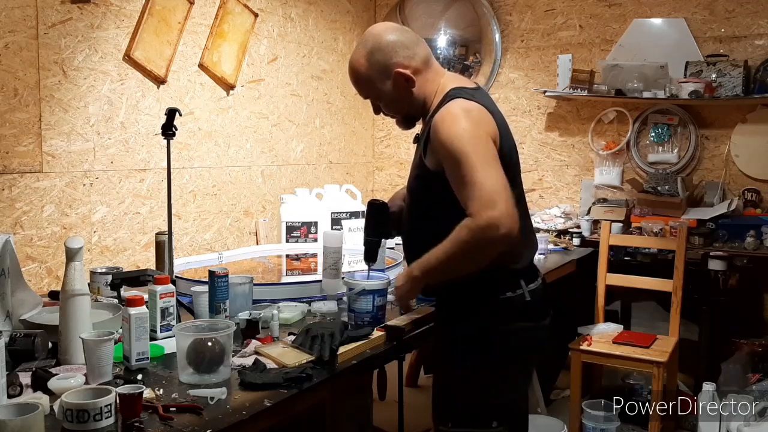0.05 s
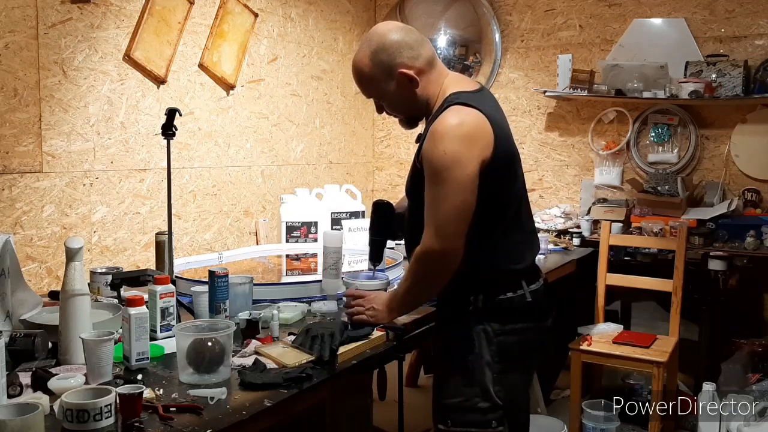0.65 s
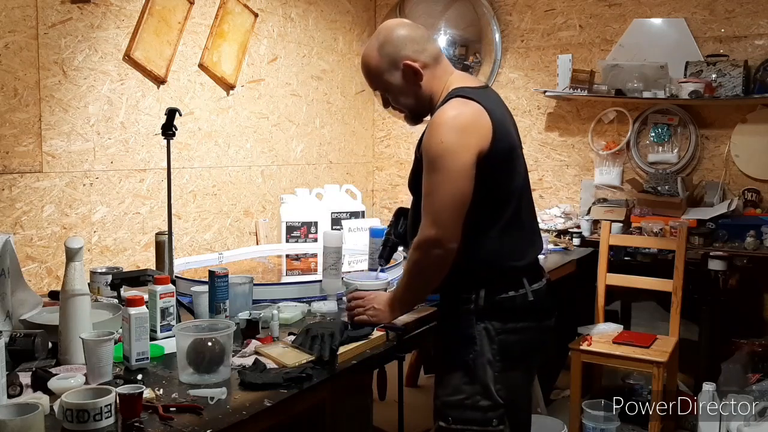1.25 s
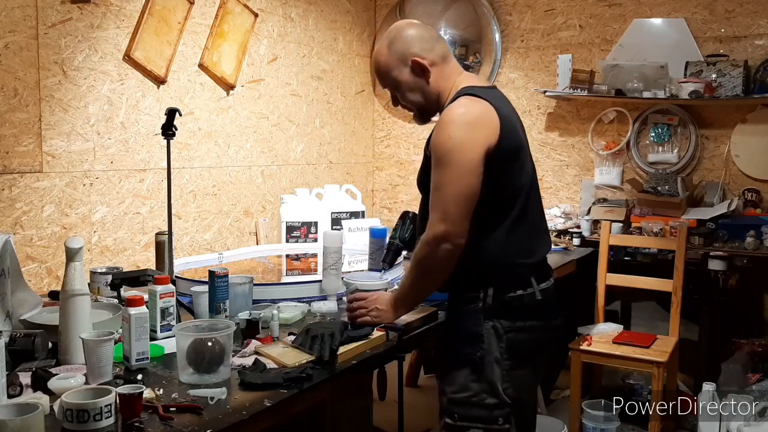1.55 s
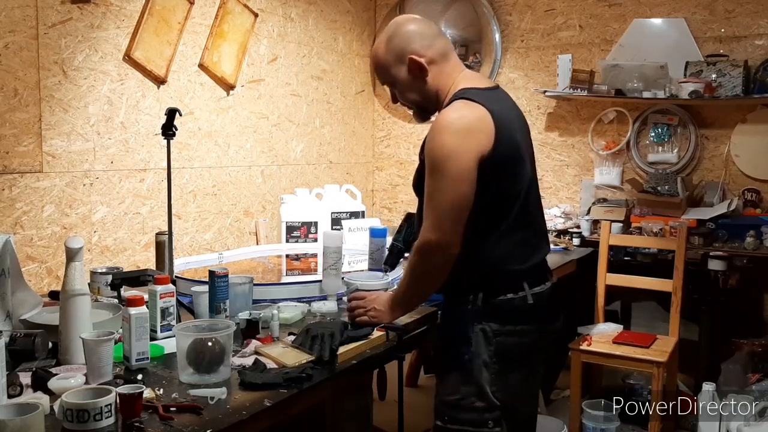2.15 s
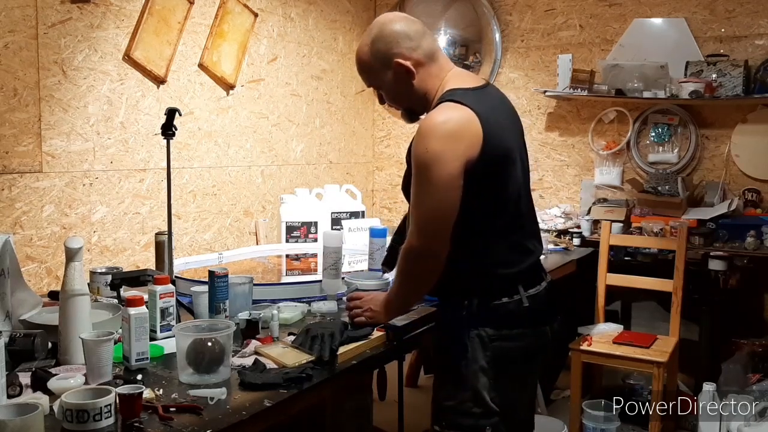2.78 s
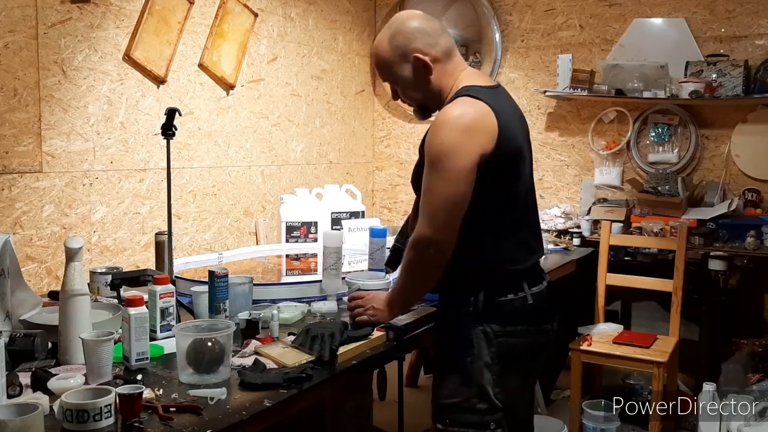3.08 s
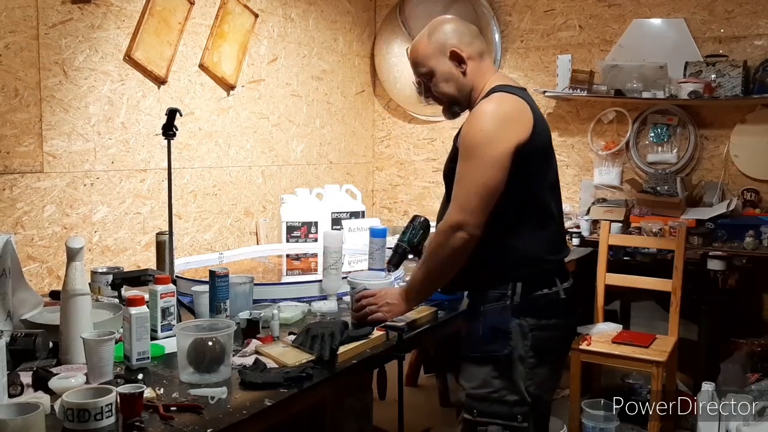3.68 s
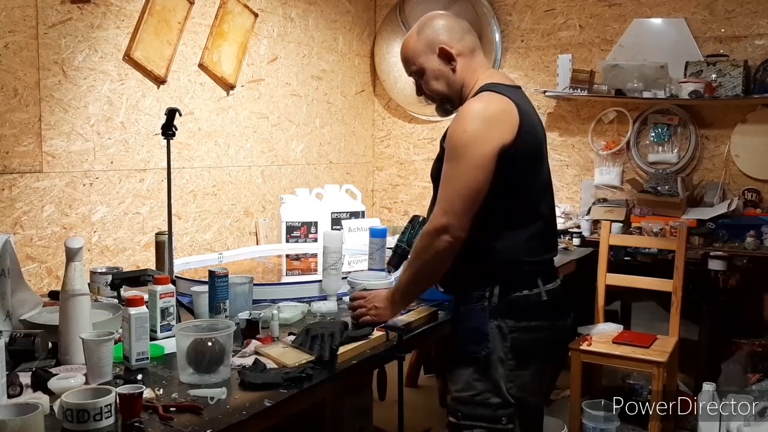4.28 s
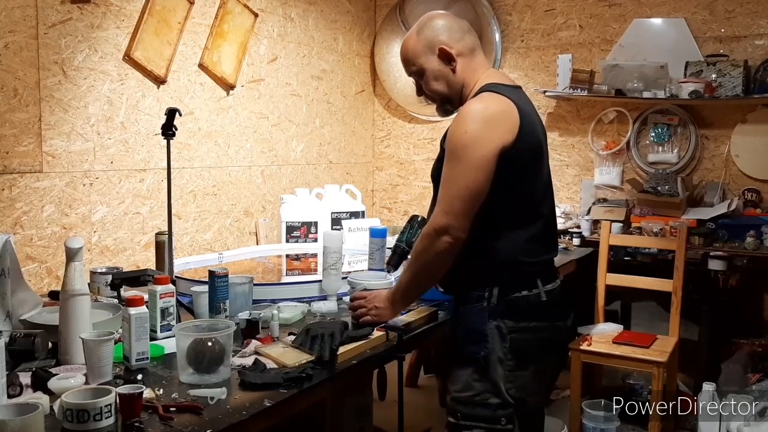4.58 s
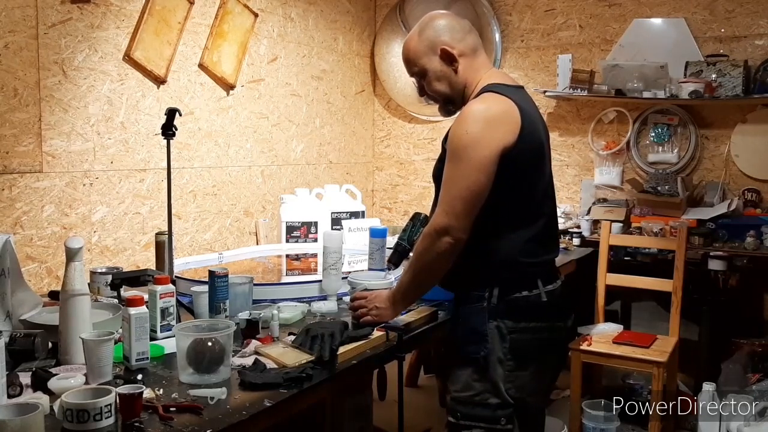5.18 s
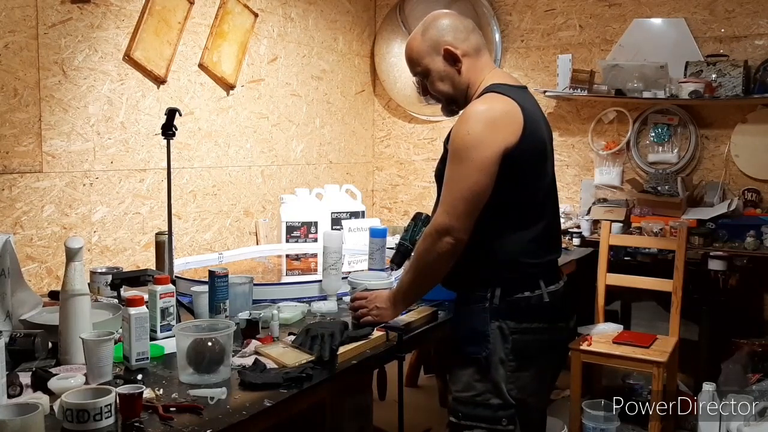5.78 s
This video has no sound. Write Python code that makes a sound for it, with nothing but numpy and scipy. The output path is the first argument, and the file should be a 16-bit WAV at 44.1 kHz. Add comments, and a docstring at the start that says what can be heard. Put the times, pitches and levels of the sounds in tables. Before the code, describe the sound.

A cordless drill whines steadily at low speed, stirring thick paste in a cup in a small workshop.

```python
"""A cordless drill turns a paddle in a cup of thick paste, at an even low speed, in a small workshop.
From the start the motor hums and whines on multiples of its shaft speed, over the rasp of gears and
cooling air; as the drill is moved about, its tones swell and fade on each side.
Near 1 s the faint shaft tone swells once. Around 2.8 s two soft bumps hit the bench amid a low rustle.
The drill runs on to the end."""
import sys
import numpy as np
from scipy import signal
from scipy.io import wavfile
from scipy.ndimage import uniform_filter1d

SR = 44100
rng = np.random.default_rng(int(sys.argv[2]) if len(sys.argv) > 2 else 0)


def put_to_file(sound):
    """Save the sound as 16-bit audio at rate SR, in the file named by the first command-line argument."""
    columns = np.atleast_2d(sound).T  # one column per channel
    safe = np.clip(columns, -1, 1)
    whole_steps = np.round(safe * 32767)
    wavfile.write(sys.argv[1], SR, whole_steps.astype(np.int16))


N = 257544
HOP = 256
TIME = np.arange(N) / SR


def amp(db):
    """Decibels to gain."""
    return 10 ** (np.asarray(db) / 20)


def unit(x):
    """Scale to rms 1."""
    return x / np.sqrt(np.mean(abs(x) ** 2) + 1e-20)


def swell(centre_s, sigma_s):
    """Gaussian in time, peak 1."""
    return np.exp(-((TIME - centre_s) / sigma_s) ** 2 / 2)


def curves(rows):
    """Table columns, interpolated over time."""
    times_s, *columns = np.transpose(rows)
    return [np.interp(TIME, times_s, column) for column in columns]


def spectra(rows, hz):
    """Table columns, interpolated over log frequency."""
    row_hz, *columns = np.transpose(rows)
    return np.array([np.interp(np.log(hz + 1), np.log(row_hz), column) for column in columns])


def drift(rate_hz, count=2048):
    """Complex noise, rms 1, rolling off above rate_hz."""
    hz = np.fft.fftfreq(count, HOP / SR)
    spectrum = rng.standard_normal(count) + 1j * rng.standard_normal(count)
    smooth = np.fft.ifft(spectrum / (1 + (hz / rate_hz) ** 2))
    return unit(np.interp(TIME, np.arange(count) * HOP / SR, smooth))


def patches(shape, frames, bins):
    """Random field per side, rms 1, smoothed over frames and bins."""
    field = uniform_filter1d(rng.standard_normal(shape), frames, axis=1, mode="wrap")
    return unit(uniform_filter1d(field, bins, axis=2))


def tone(cycles, hz, scatter, fade_hz, flutter):
    """Stereo tone, rms 1: a steady part plus room reflections that shift as the drill moves."""
    paths = np.array([1 + scatter * drift(fade_hz) + flutter * drift(rate_hz=29) for side in range(2)])
    lead_rad = min(hz / 1100, np.pi / 2)  # short waves reach the sides out of step
    paths[0] *= np.exp(1j * lead_rad)
    wave = (paths * np.exp(2j * np.pi * (cycles + rng.random()))).real
    return np.array([unit(side) for side in wave])


def rustle(level_db=-71, band_hz=(80, 260)):
    """Faint low noise around the bumps."""
    band = signal.butter(2, band_hz, "bandpass", fs=SR, output="sos")
    noise = unit(signal.sosfilt(band, rng.standard_normal(N)))
    return amp(level_db) * swell(centre_s=2.8, sigma_s=0.44) * noise


def bumps(body_hz=255, thud_hz=140, thud_db=-8):
    """Two pairs of dull pushes rise and die quickly in two low modes of the bench top."""
    # Each row: start in seconds, level in dB, rise time in seconds.
    pushes = [(2.673, -60, 0.0095), (2.723, -52.5, 0.011), (2.856, -52, 0.007), (2.864, -54, .011)]
    out = np.zeros(N)
    for start_s, db, rise_s in pushes:
        age_s = np.maximum(TIME - start_s, 0)
        envelope = age_s / rise_s * np.exp(1 - age_s / rise_s)
        ring = np.sin(2 * np.pi * body_hz * age_s) + amp(thud_db) * np.sin(2 * np.pi * thud_hz * age_s)
        out += amp(db) * envelope * ring
    return out


def rasp(turns, ripple_db=3.0, patchy_db=0.5, flicker_db=0.39, pivot_hz=1850, width_octaves=0.31):
    """Gear, brush and cooling-air noise, coloured by shifting reflections, pulsing with each turn."""
    # Each row: frequency in Hz, left and right base density in dB per Hz.
    density = [(30, -105, -106), (100, -97, -101.5), (456, -91.5, -93), (660, -81.5, -77),
               (676, -82.5, -92.5), (1304, -78, -80.5), (2410, -71.5, -72.5), (3640, -67, -68.5),
               (4370, -64, -63.5), (5330, -71, -67.5), (7130, -70.5, -72), (8620, -78.5, -80.5),
               (11950, -75.5, -78.5), (15000, -84.5, -84)]
    # Each row: frequency in Hz, left-right correlation from 0 to 1.
    correlation = [(30, .93), (90, 0.76), (300, 0.56), (650, 0.86), (1400, 0), (3000, 0.25), (15000, 0.05)]
    # Drill tilted and shielded by the arm. Each row: time in seconds, gain in dB, mid-range tilt in dB.
    posture = [(0.0, 0.9, 0.7), (0.88, 0.6, 1.5), (1.0, 0.1, 0.5), (2.2, 0.4, -0.5), (2.4, -0.8, -0.6),
               (3.22, -0.4, -0.0), (3.36, 0.4, -1.0), (3.48, 0.1, 0.4), (4.48, -0.2, -0.6),
               (5.04, -0.1, -0.0), (5.42, -0.7, -0.9), (5.84, -0.4, 0.2)]
    hz = np.fft.rfftfreq(8 * HOP, 1 / SR)
    frames = N // (2 * HOP) + 6
    shape = (2, frames, len(hz))
    spectrum = rng.standard_normal(shape) + 1j * rng.standard_normal(shape)
    shared = np.clip(spectra(correlation, hz)[0], 0, 1)
    spectrum[1] = shared * spectrum[0] + np.sqrt(1 - shared ** 2) * spectrum[1]
    colour = amp(spectra(density, hz))
    room_db = ripple_db * patches(shape, frames=45, bins=3)
    gear_db = patchy_db * patches(shape, frames=7, bins=30)
    spectrum *= colour[:, None] * amp(room_db + gear_db)
    # Positive tilt lifts the band above the pivot and lowers the band below.
    gain_db, tilt_db = curves(posture)
    frame_tilt_db = np.interp(np.arange(frames) * 2 * HOP / SR, TIME, tilt_db)
    offset = np.log2((hz + 1) / pivot_hz) / width_octaves
    spectrum *= amp(np.outer(frame_tilt_db, offset * np.exp((1 - offset ** 2) / 2)))
    _, noise = signal.istft(spectrum.transpose(0, 2, 1), nperseg=8 * HOP, noverlap=6 * HOP)
    noise = unit(noise[:, :N]) * np.sqrt(np.mean(colour ** 2) * SR / 2)
    pulse = 1 + 0.04 * (np.cos(2 * np.pi * turns) + np.cos(4 * np.pi * turns))
    flicker = unit(drift(rate_hz=15).real)
    return noise * pulse * amp(gain_db + flicker_db * flicker)


def gears(turns, shaft_hz, gear_ratio=6.41):
    """Thin, wavering tones from rotor and gear teeth; low hum from the first planet carrier."""
    # Each row: multiple of shaft speed, left level in dB, right level in dB.
    overtones = [(4, -60, -62), (7, -61, -54), (9, -55, -51), (9.53, -57, -66), (10.39, -47, -49),
                 (11, -52, -53), (11.53, -54, -62), (12, -54, -55), (13, -49, -49), (14, -51, -46),
                 (16, -56, -48), (18, -51, -52), (19.93, -52, -51), (21, -52, -50), (22, -49, -49),
                 (23, -54, -55), (24, -51, -54), (25, -54, -59), (26, -57, -59), (29, -57, -61),
                 (30, -54, -56), (31, -59, -60), (33, -59, -64), (35, -59, -62), (37, -60, -62),
                 (39, -60, -63), (40, -52, -54), (45, -65, -65)]
    # Each row: multiple of carrier speed, level in dB.
    carrier = [(1, -80.5), (2, -83.5), (3, -87), (4, -84), (5, -100), (7, -80.5), (9, -78)]
    out = np.zeros((2, N))
    for multiple, left_db, right_db in overtones:
        gain = amp([[left_db], [right_db]])
        out += gain * tone(multiple * turns, multiple * shaft_hz, scatter=4.8, fade_hz=1.43, flutter=1)
    for multiple, db in carrier:
        ratio = multiple / gear_ratio
        out += amp(db) * tone(ratio * turns, ratio * shaft_hz, scatter=0.14, fade_hz=1.2, flutter=0.23)
    return out


def motor_hum(turns, shaft_hz, left_bias_db=2.0):
    """First three shaft harmonics, louder on the left; the lowest swells once."""
    # Each row: time in seconds, base levels of harmonics 2 and 3 in dB.
    levels = [(0.0, -53.1, -53.5), (0.96, -50.3, -50.9), (2.26, -51.3, -52.5), (2.38, -51.9, -58.0),
              (3.92, -50.2, -50.8), (4.54, -49.8, -53.2), (4.68, -49.1, -60.7), (5.02, -50.2, -52.4),
              (5.84, -48.3, -51.8)]
    second_db, third_db = curves(levels)
    first_db = -73.5 + 8 * swell(centre_s=0.93, sigma_s=0.46)
    side_db = np.array([[left_bias_db], [-left_bias_db]])
    out = np.zeros((2, N))
    for multiple, db, flutter in [(1, first_db, 0.15), (2, second_db - 0.2, 0.05), (3, third_db, 0.2)]:
        wave = tone(multiple * turns, multiple * shaft_hz, scatter=0.14, fade_hz=6, flutter=flutter)
        out += amp(db + side_db) * wave
    return out


def motor_highs(turns, shaft_hz, fifth_db_per_s=0.34, octave_db_per_s=-0.5):
    """Wavering tones a fifth and an octave above the whine; the octave flares as the drill moves."""
    # Each row: centre in seconds, left gain in dB, right gain in dB.
    flares = [(.12, 6, 7), (.85, 3, 3), (1.33, 7, -3), (1.56, -2, 7.5), (2.03, 1, 10), (3.08, 2, 4),
              (3.35, 8, 2)]
    fifth_db = np.array([[-45], [-43.5]]) + fifth_db_per_s * TIME
    octave_db = -43 + octave_db_per_s * TIME
    for centre_s, *gain_db in flares:
        octave_db = octave_db + np.outer(gain_db, swell(centre_s, sigma_s=0.061))
    out = np.zeros((2, N))
    for multiple, db in [(15, fifth_db), (20, octave_db)]:
        wave = tone(multiple * turns, multiple * shaft_hz, scatter=0.54, fade_hz=7, flutter=0.81)
        out += amp(db) * wave
    return out


def motor_whine(turns, cycles_per_turn=10, echo_db=-46, shake=0.071):
    """Main motor tone; standing waves in the room steer it between the sides."""
    # Each row: time in seconds, left and right direct level in dB, left phase lead in radians.
    steering = [(0.0, -36.2, -41.3, 1.4), (0.18, -39.0, -33.5, 3.5), (0.26, -34.8, -42.4, 0.3),
                (0.8, -37.1, -34.8, 0.8), (1.08, -25.6, -36.8, 2.0), (1.24, -26.6, -40.5, 1.0),
                (1.38, -42.4, -38.1, 1.7), (1.5, -33.1, -34.2, -0.1), (1.68, -37.0, -36.0, 1.7),
                (1.88, -29.5, -37.1, 2.9), (2.18, -27.5, -28.7, 1.8), (2.44, -30.3, -32.0, 2.8),
                (2.9, -31.5, -41.4, 2.2), (2.98, -33.5, -40.7, 0.6), (3.18, -30.4, -37.6, 3.2),
                (3.36, -25.9, -34.6, 1.7), (3.66, -29.8, -37.8, 2.4), (3.8, -35.9, -35.2, 0.8),
                (4.14, -29.2, -36.8, 1.7), (5.84, -29.4, -28.1, 1.6)]
    left_db, right_db, lead_rad = curves(steering)
    tremble = 1 + shake * np.array([drift(rate_hz=42) for side in range(2)])
    direct = amp([left_db, right_db]) * tremble * np.exp(0.5j * np.array([lead_rad, -lead_rad]))
    # Faint shifting reflections make the tone flutter where it is weak.
    echo = amp(echo_db) * np.array([drift(rate_hz=7) for side in range(2)])
    return np.sqrt(2) * ((direct + echo) * np.exp(2j * np.pi * cycles_per_turn * turns)).real


def scene(wobble_hz=0.193):
    """One shaft drives every part of the drill; the paste tugs at its speed."""
    # Sags slightly under load. Each row: time in seconds, shaft speed in turns per second.
    shaft_speed = [(0.0, 315.2), (0.1, 312.7), (0.36, 314.8), (0.56, 313.9), (1.28, 314.8), (2.02, 313.4),
                   (3.74, 313.9), (4.72, 313.2), (5.04, 313.9), (5.84, 313.4)]
    speed_hz, = curves(shaft_speed)
    turns = np.cumsum(speed_hz + wobble_hz * unit(drift(rate_hz=9.9).real)) / SR
    shaft_hz = speed_hz.mean()
    motor = motor_whine(turns) + motor_hum(turns, shaft_hz) + motor_highs(turns, shaft_hz)
    return motor + gears(turns, shaft_hz) + rasp(turns) + bumps() + rustle()


def record(dry, cutoff_hz=15230):
    """Steep low-pass band limit."""
    lowpass = signal.firwin(511, cutoff_hz, window=("kaiser", 9), fs=SR)
    return signal.oaconvolve(dry, lowpass[None], "same")


dry = scene()
out = record(dry)
put_to_file(out)
```